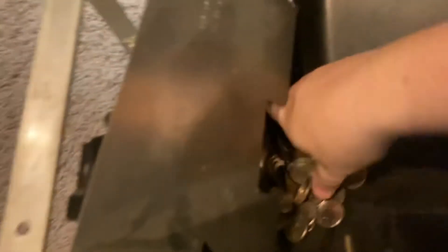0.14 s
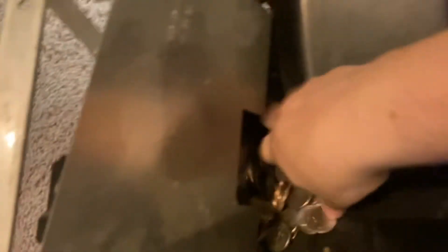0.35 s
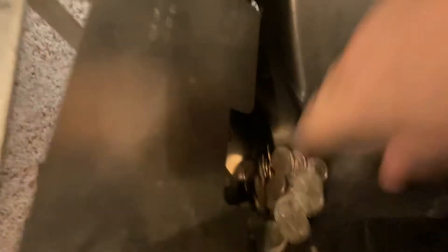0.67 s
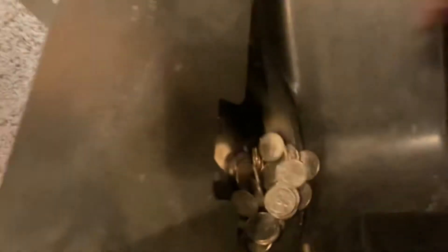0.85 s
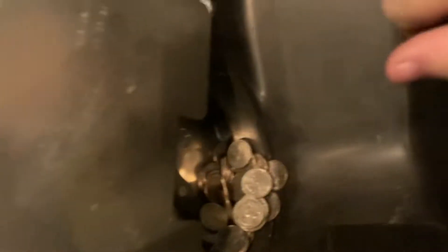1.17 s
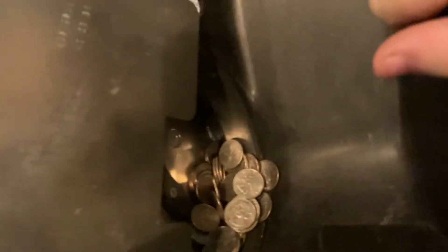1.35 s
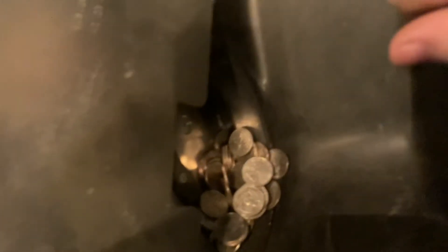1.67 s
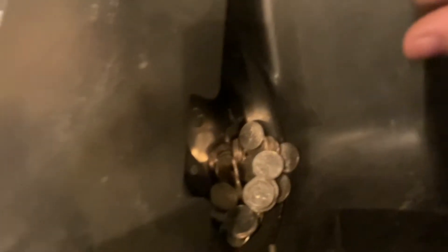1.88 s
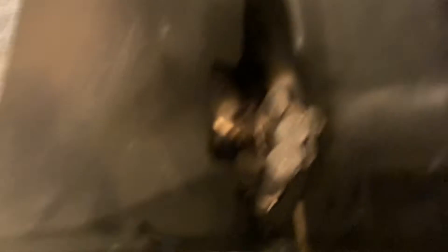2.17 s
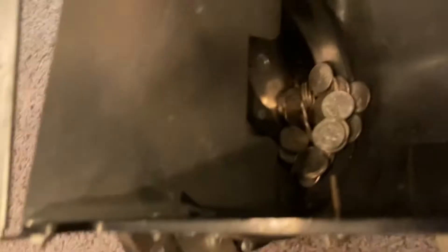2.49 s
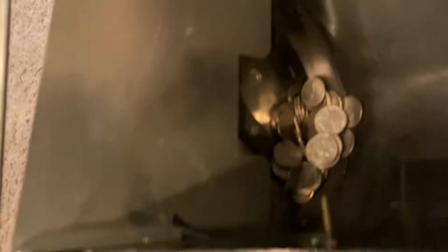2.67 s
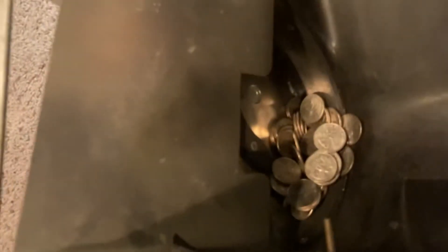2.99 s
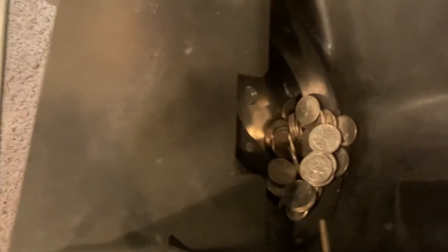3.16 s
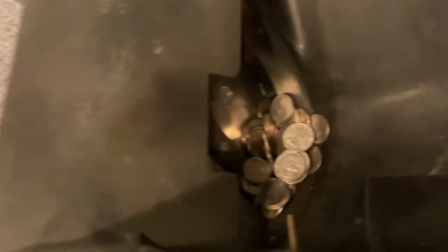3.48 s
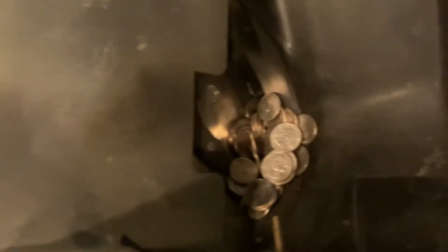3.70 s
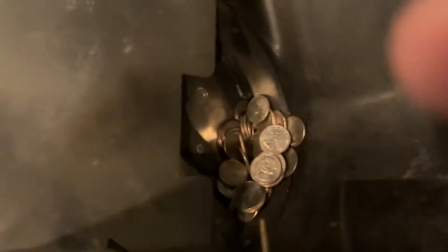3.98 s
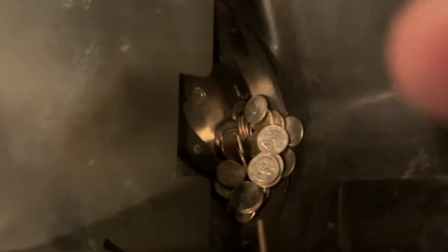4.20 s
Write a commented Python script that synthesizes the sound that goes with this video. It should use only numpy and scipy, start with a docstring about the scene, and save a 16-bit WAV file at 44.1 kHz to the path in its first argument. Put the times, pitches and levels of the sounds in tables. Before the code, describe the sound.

Close inside a hollow sheet-metal bucket, a hand stirs loose coins. From 0 to about 0.2 s there are light, crisp clinks and small scrapes. At roughly 0.22 s the hand shoves the heap: a dense, loud burst of bright coin clatter, with very high short rings, midrange wall ringing and low dull booms from the bottom, strongest from 0.25 to 0.55 s. It thins into scattered weaker ticks until 0.72 s. At about 0.75 s the hand lifts with a muffled thud and a last coin clinks, leaving a brief metallic ring. Soft airy brushing of the arm fades between 0.8 and 1.5 s. Throughout, a fan gives a low, gently wavering hum with soft airflow in a dry carpeted room, plus slight hiss. A barely audible tick comes near 2.9 s, a clearer tick with a quick dull double thud at 3.24 s, and a faint tick at 3.42 s. Then only the fan remains.

```python
"""Coins stirred in a metal bucket

Close to a phone, a hand stirs a heap of coins on a sheet-metal bucket's bottom, lifts off and drops a last coin.
Each contact sums a noisy click, short coin modes and ringing of wall and bottom; pushes make the bottom boom.
A fan hums throughout in the carpeted room: wavering harmonics over filtered noise. The arm brushes past as
shaped noise, and faint grip ticks and a double thud follow."""
import sys
import numpy as np
from scipy import signal
from scipy.fft import rfft, irfft, next_fast_len
from scipy.io import wavfile
from scipy.ndimage import uniform_filter1d

SR = 44100
rng = np.random.default_rng(int(sys.argv[2]) if len(sys.argv) > 2 else 0)


def generate_wav(signal):
    """Clip the signal to [-1, 1] and save it as 16-bit WAV at the path in sys.argv[1]."""
    frames = np.transpose(np.atleast_2d(signal))
    scaled = np.clip(frames, -1, 1) * 32767
    pcm = np.round(scaled).astype(np.int16)
    wavfile.write(sys.argv[1], SR, pcm)


N = 191394

# The fan's hum. Each row: multiple of the shaft rate, mean level in dB.
FAN_HARMONICS = [(1, -51.5), (3, -52.5), (4, -58), (5, -61), (6, -64.5)]
# The fan's low rumble. Each row: frequency in Hz, density in dB per Hz.
FAN_RUMBLE = [(25, -100), (35, -90.5), (45, -86.5), (75, -69.5), (135, -72.5), (170, -66), (200, -70.5),
              (235, -67.5), (280, -72.5), (315, -81.5), (400, -77), (470, -90), (900, -120)]
# The fan's airflow before its flutter. Each row: frequency in Hz, density in dB per Hz.
FAN_AIRFLOW = [(300, -87.5), (600, -89), (780, -84), (1300, -90.5), (1650, -91.5), (2200, -93),
               (2500, -96.5), (3100, -98), (3600, -102), (4700, -101.5), (6500, -116), (9000, -135)]
# Hiss of the microphones. Each row: frequency in Hz, density in dB per Hz.
MIC_HISS = [(4000, -120), (7000, -116), (8400, -112), (10500, -117), (12500, -118), (15500, -126)]
# Colour of the room's tail. Each row: frequency in Hz, relative level in dB.
ROOM_COLOUR = [(2000, 8), (6000, 1), (11000, -7.5), (15000, -10)]
# Likeness of left and right for the fan. Each row: frequency in Hz, coherence from 0 to 1.
ROOM_COHERENCE = [(60, 0.93), (300, 0.99), (500, 0.93), (1000, 0.5), (4500, 0.13)]
# Likeness of left and right for close sounds and hiss. Each row: frequency in Hz, coherence from 0 to 1.
NEAR_COHERENCE = [(300, 0.29), (550, 0.94), (1000, 0.62), (2000, 0.26), (4500, .15), (6000, 0.29),
                  (7500, 0.98), (9000, 1), (14000, 0.56), (15300, 0.65)]
# Left minus right for the bucket. Each row: frequency in Hz, difference in dB.
BUCKET_BALANCE = [(200, -1.5), (600, 3), (1800, 3.5), (4000, 1), (7000, -2)]
# Echoes between the bucket's walls. Each row: delay in seconds, level in dB.
WALL_ECHOES = [(.0034, -16.5)]
# Ticks of the grip. Each row: start in seconds, level in dB.
GRIP_TICKS = [(2.8911, -33), (3.2380, -18), (3.421, -30.5)]
# Spectrum of a grip tick. Each row: frequency in Hz, relative density in dB.
TICK_SPECTRUM = [(1000, -19), (3000, 5.5), (4000, 11), (6000, 5), (8000, 13), (12000, 10), (16000, -1)]
# Dull handling thuds. Each row: start in seconds, level in dB, low pitch in Hz, high pitch in Hz.
HANDLING_THUDS = [(3.2392, -16.5, 563, 970), (3.2564, -18.5, 562, 1367)]
# Spectrum of a handling thud's crack. Each row: frequency in Hz, relative density in dB.
THUD_SPECTRUM = [(120, -12), (200, -1), (350, 0), (520, 11.5), (720, 10), (900, -4), (1400, -7),
                 (3000, -11), (4500, -14), (8000, -21)]
# Faint ring of a handling thud. Each row: frequency in Hz, relative level in dB, t60 in seconds.
THUD_RING = [(403, -6, 0.44), (533, 6, 0.38), (590, 2, .1), (989, -1, 0.21), (1360, -16, .28),
             (1750, -4, .4)]
# The arm brushes past as it draws back. Each row: centre in seconds, half length in seconds (to 1/e),
# mean level in dB before flutter and swell, brightness in dB per octave.
ARM_BRUSHES = [(0.874, .14, -54.5, -3.5), (1.11, .07, -60, -0.5), (1.248, .25, -69.5, -2)]
# Spectrum of the brushing before its tilt. Each row: frequency in Hz, relative density in dB.
RUB_SPECTRUM = [(1500, -10.5), (3800, 12.5), (4800, -3.5), (5800, 6), (8000, -8), (11500, 1), (16000, -24)]
# Spectrum of the bucket's bottom. Each row: frequency in Hz, relative density in dB.
BOTTOM_SPECTRUM = [(40, -49), (140, -22.5), (230, 0.5), (330, -0.5), (380, 7), (420, 2.5), (490, 4.5),
                   (600, 3.5), (700, -6.5), (850, -7.5), (1000, -7), (1500, -12), (5000, -45)]
# Booming of the loaded bottom. Each row: frequency in Hz, relative level in dB, t60 in seconds.
BOOM_RING = [(243, 1, .13), (290, -2.5, .12), (382, -0.5, 0.11), (473, 2.5, .2), (509, 3, .14),
             (607, 1.5, .12)]
# The hand shoves the heap at the bottom. Each row: start in seconds, level in dB, favoured pitch in Hz.
HEAP_SHOVES = [(.221, -12, 243), (.252, -2.5, 607), (.264, 2, 509), (.272, -2, 243), (.303, -2, 290),
               (.331, -4, 290), (.386, -8.5, 382), (.398, -4, 607), (.423, -.5, 473), (.462, -6.5, 382),
               (.492, -4.5, 509)]
# Ringing of the bucket's wall. Each row: frequency in Hz, relative level in dB, undamped t60 in seconds.
WALL_RING = [(981, 1.5, .16), (1220, -3.5, 0.17), (1310, 5, 0.163), (1460, -2, .16), (1615, 2.5, 0.36),
             (1677, 4.5, 0.25), (1814, 3, 0.91), (1970, 3.5, .15), (2013, 1.5, 0.18), (2028, 5, 0.3),
             (2331, -5, .5), (2430, -1.5, 0.18), (2630, 5, 0.17), (2900, 1, 0.16), (3260, 3, .14),
             (3360, 2, 0.11), (3770, 0, .15), (4217, 1.5, .12), (5685, -4, .12)]
# Spectrum of the bucket's wall, uneven from spot to spot. Each row: frequency in Hz, relative density in dB.
WALL_SPECTRUM = [(200, -24), (850, -5.5), (1100, -4), (1300, 2.5), (1550, -2.5), (1800, 5), (2100, 2),
                 (2400, -1), (3200, 1.5), (4500, -4), (8000, -13.5)]
# Lowest bending modes of the coins. Each row: frequency in Hz, relative level in dB.
COIN_RING = [(14700, -4.5), (14985, -6.5), (15128, -2), (15198, -1), (15329, 1), (15478, -3.5), (15564, 4)]
# Spectrum of a coin's click, uneven from spot to spot. Each row: frequency in Hz, relative density in dB.
CLICK_SPECTRUM = [(300, -44), (2000, -13.5), (3500, -0.5), (5200, -.5), (6500, 2.5), (8000, 2.5),
                  (9500, 9.5), (11000, 7), (13000, 3.5), (16000, -9.5)]
# Sweeps of the hand through the heap; contacts before time zero are left out.
# Each row: start in seconds, end in seconds, effort in dB, settling afterwards in dB per second.
HAND_SWEEPS = [(-.04, 0.082, -38.5, 901), (0.048, 0.103, -41, 898), (0.139, 0.155, -35, 1798),
               (0.221, 0.425, -18.5, 298.5), (0.451, 0.51, -21, 112.5)]
# Coins that strike hard. Each row: start in seconds, relative level in dB, knock on the wall relative to the
# click in dB, extra ring of the coin in dB, change per bounce in dB, pitch of the wall in Hz,
# low pitch of the coins in Hz, high pitch of the coins in Hz.
HARD_STRIKES = [(.002, -9, -0.5, -5, -2.5, 1220, 5470, 10700),
                (.011, -10.5, -0.5, 0.5, -2.5, 1320, 8100, 11500),
                (.0243, -10, -19, -2, -7, 3108, 5940, 10680),
                (.056, -16, -0.5, 1.5, -4.5, 3310, 5990, 11060),
                (.083, -14.5, 4.5, -3.5, 1.5, 2210, 5950, 11980),
                (.0907, 0.5, -1, 0, -4.5, 2178, 6000, 10640), (.112, -20.5, 7, -2.5, 0, 1970, 3540, 10050),
                (.122, -24.5, 11, -0.5, -5.5, 1882, 3520, 10000),
                (.1353, -19.5, 14, -0.5, -4, 1460, 3630, 11870), (.154, -7, -5, 3, -3, 2334, 3800, 9995),
                (.164, -19, 9.5, 0, -8.5, 3053, 3780, 9820), (.216, -1, -2.5, -7.5, -12, 1200, 3630, 12750),
                (.228, -6, 4.5, -5.5, -6, 1272, 6240, 12760),
                (.2363, -1.5, -1.5, -6, -1, 2070, 6170, 10380),
                (.2511, 15.5, -4, 1.5, -2.5, 2049, 3770, 12320),
                (.2619, 14.5, -1.5, 4.5, -2, 3203, 7750, 10030), (.27, 9, -1.5, 3, 2.5, 1398, 7700, 10030),
                (.277, 11, -18, 1.5, -3.5, 1900, 8000, 10720),
                (.3025, 6.5, -7.5, -1, 1.5, 2707, 8190, 9830),
                (.3345, 10, -6.5, -5.5, -3.5, 2540, 7700, 12170), (.347, 9, -7, 0, 1.5, 1865, 7900, 10330),
                (.353, 13.5, -2, 0.5, -5, 2140, 8000, 10470),
                (.376, 7.5, -2.5, -2.5, -6.5, 2992, 8140, 10280),
                (.385, 7.5, -3.5, 3, -0.5, 2942, 6910, 10550), (.391, 12.5, -10, -1, 0, 2070, 6850, 10530),
                (.398, 11, 2.5, -1.5, -2.5, 2007, 6660, 10140), (.4222, 2, 12, 2, -6, 2040, 4080, 10680),
                (.428, 1, 4.5, 1, -7, 2680, 4150, 9960), (.449, -2.5, -3.5, 0.5, -6, 1420, 5610, 11480),
                (0.4594, 11, -1.5, 2.5, -2.5, 2940, 4980, 11910), (.4848, 7, -5, 1, -4, 3460, 7670, 10470),
                (0.4911, 11, -5, -1, -4.5, 3293, 5030, 10450), (.4976, 8.5, -3, -4, -1, 1690, 3930, 9940),
                (.507, 0.5, 0, 2, -3, 2384, 4030, 9780), (.5405, 9.5, -4, 2.5, 0, 2967, 7430, 10620),
                (.544, 1.5, -12, 6, 0, 2650, 7600, 10700), (.554, -1.5, 3, -0.5, 8.5, 2651, 7350, 10700),
                (.56, -5.5, -2.5, 5.5, -9.5, 2640, 7790, 9970), (.602, -3.5, 5, 4, -5, 2200, 4400, 10200),
                (.638, -4, -16, 0, 0, 2400, 7760, 10050), (.649, -6, -12, 0, -7, 1920, 8100, 9810),
                (.66, -8, -9, -4, -3.5, 1920, 7840, 9800), (.681, -8.5, -9, -11, -2, 1830, 7800, 10000),
                (.7173, -9, -7.5, -5, 0, 1640, 8070, 11040), (.7505, 2.5, -5, -1, -3.5, 1690, 8300, 9760),
                (.757, -3, -1.5, -3, -6, 1220, 7640, 11130)]

TIME = np.arange(N) / SR
RING_TIME = TIME[:SR // 2]
FAN_HZ, FAN_LAG_S = 57.48, .00041  # shaft rate; delay of the right channel
# spread of coin pitches and of the wall's modes in the shifting heap, as a share of the frequency
COIN_SPREAD, WALL_SPREAD = 0.0024, 0.0025
# a sweep starts softly and reaches its full effort after this time
DIG_S, DIG_DB = 0.0408, -13
# the fingers open: coins ring more freely and the weight comes off the bottom
RELEASE_AT_S, RELEASE_S = 0.29, 0.0897
FREED_RING_DB, UNLOADED_BOTTOM_DB = 9.5, -4.5
BODY_GROWTH = 0.76  # dB gained by bottom, and by the wall in sweeps, per dB of click
LIFT_S, LIFT_DB = .744, -4  # the hand lifts off the bottom
PORT_LAG_S, PORT_MATCH_HZ = .000222, 6850  # treble lag between the ports, and where it sets in
TOP_HZ = 15750


def undb(db):
    """Decibels to gain."""
    return 10 ** (np.asarray(db) / 20)


def unit(x):
    """Scale to a mean energy of one per channel."""
    return x / np.sqrt(np.sum(x ** 2, axis=-1).mean())


def along(points, size):
    """Read (Hz, value) points at the bins of a transform of this size."""
    hz, value = np.transpose(points)
    bins = np.arange(size // 2 + 1) * SR / size
    return np.interp(np.log(bins + 1), np.log(hz), value)


def colour(x, spectrum):
    """Minimum-phase, so causal, filter with the given (Hz, dB) spectrum."""
    size = 2 * next_fast_len(x.shape[-1])
    # folding the cepstrum onto positive time gives the minimum phase
    cepstrum = irfft(np.log(undb(along(spectrum, size))))
    cepstrum[1:size // 2] *= 2
    cepstrum[size // 2 + 1:] = 0
    response = np.exp(rfft(cepstrum))
    return irfft(rfft(x, size) * response)[..., :x.shape[-1]]


def pair(two, likeness):
    """Mix two unrelated signals into left and right with the given coherence."""
    size = 2 * next_fast_len(two.shape[-1])
    c = np.clip(along(likeness, size), 0, 1)
    mid, side = rfft(two, size) * np.sqrt([(1 + c) / 2, (1 - c) / 2])
    return irfft(np.array([mid + side, mid - side]))[:, :two.shape[-1]]


def noise(spectrum):
    """Two unrelated noises with the given dB per Hz."""
    return colour(rng.standard_normal((2, N)), spectrum) * np.sqrt(SR / 2)


def wander(rate):
    """Slow random drift with a spread near one, through `rate` random points per second."""
    return np.interp(TIME * rate, np.arange(200), rng.standard_normal(200))


def decay(t60):
    """Exponential decay by 60 dB in t60 seconds."""
    return undb(-60 * RING_TIME / t60)


def decaying_noise(t60):
    """Two unrelated noises that die away, with an energy of one."""
    return unit(rng.standard_normal((2, len(RING_TIME))) * decay(t60))


def note(hz, t60):
    """One decaying resonance with an energy of one."""
    return unit(np.sin(2 * np.pi * hz * RING_TIME) * decay(t60))


def burst(spectrum, t60, tail_db, tail_t60):
    """Countless close modes, as noise: a fast decay and a longer tail."""
    fast = decaying_noise(t60)
    slow = decaying_noise(tail_t60)
    return unit(pair(colour(fast + undb(tail_db) * slow, spectrum), NEAR_COHERENCE))


def ring(modes):
    """Decaying sines, randomly weighted as by where the blow lands."""
    waves = []
    for hz, db, t60 in modes:
        sine = np.sin(2 * np.pi * hz * RING_TIME)
        waves.append(undb(db) * sine * decay(t60) / np.sqrt(t60))
    weights = rng.standard_normal((2, len(modes)))
    return unit(pair(weights @ np.array(waves), NEAR_COHERENCE))


def detuned(modes, spread):
    """The same modes, each pulled a little sharp or flat."""
    return [(hz * (1 + spread * rng.standard_normal()), db, t60) for hz, db, t60 in modes]


def uneven(spectrum, ripple_db, count=70):
    """Each spot favours some resonances and misses others."""
    hz, db = np.transpose(spectrum)
    grid = np.geomspace(hz[0], hz[-1], count)
    smooth = np.interp(np.log(grid), np.log(hz), db)
    return np.column_stack([grid, smooth + ripple_db * rng.standard_normal(count)])


def blows(times, sizes):
    """A train of impulses."""
    return np.bincount(np.clip(times * SR, 0, N - 1).astype(int), sizes, N)


def sound(force, response):
    """A force train played through a response of one or two channels."""
    active = force[None, :np.flatnonzero(force)[-1] + 1]
    out = signal.fftconvolve(active, response, axes=1)[:, :N]
    return np.pad(out, ((0, 0), (0, N - out.shape[1])))


def single_blow(s, level_db, response):
    """One blow at s seconds."""
    return sound(blows(np.array([s]), undb([level_db])), response)


def hiss():
    """Steady noise of the microphones."""
    return pair(noise(MIC_HISS), NEAR_COHERENCE)


def fan(waver_db=1.5, drift_rad=0.61, flutter_db=1.5):
    """A fan off to the left: wavering shaft harmonics over rumble and fluttering airflow."""
    hum = 0
    for order, db in FAN_HARMONICS:
        level = undb(db + waver_db * wander(3.3)) * np.sqrt(2)
        drift = drift_rad * np.sqrt(order) * wander(3.114)
        hum = hum + level * np.sin(2 * np.pi * order * FAN_HZ * TIME + drift)
    air = noise(FAN_AIRFLOW) * undb(flutter_db * wander(7.6))
    left, right = hum + pair(noise(FAN_RUMBLE) + air, ROOM_COHERENCE)
    return np.array([left, np.roll(right, int(FAN_LAG_S * SR))])


def room(x, wet_db=-23, t60=.6):
    """The carpeted room adds a faint, dull tail."""
    tail = colour(decaying_noise(t60), ROOM_COLOUR)
    return x + undb(wet_db) * signal.fftconvolve(x, tail, axes=1)[:, :N]


def walls(x):
    """The bucket's walls return the sound within a few milliseconds, which makes it hollow."""
    out = x
    for s, db in WALL_ECHOES:
        delayed = np.pad(x, ((0, 0), (int(abs(s) * SR), 0)))[:, :N]
        out = out + undb(db) * delayed
    return out


def handling(modes_db=-7, crack_db=-2.0, crack_t60=0.03, tail_db=-5, tail_t60=.3,
             low_db=-4.0, high_db=-11, note_t60=0.036):
    """Faint ticks of the grip and a double thud whose two contacts punch at different pitches."""
    s, tick_db = np.transpose(GRIP_TICKS)
    out = sound(blows(s, undb(tick_db)), burst(TICK_SPECTRUM, t60=.016, tail_db=-12, tail_t60=.3))
    body = unit(sum(undb(db) * note(hz, t60) for hz, db, t60 in THUD_RING))
    for s, level_db, low_hz, high_hz in HANDLING_THUDS:
        crack = burst(THUD_SPECTRUM, crack_t60, tail_db, tail_t60)
        punch = undb(low_db) * note(low_hz, note_t60) + undb(high_db) * note(high_hz, note_t60)
        thud = undb(modes_db) * body + undb(crack_db) * crack + punch
        out = out + single_blow(s, level_db, thud)
    return out


def rustle(flutter_db=2):
    """Skin and sleeve brush softly as the arm leaves the bucket; each brush swells and fades unevenly."""
    out = 0
    for s, half, level_db, tilt in ARM_BRUSHES:
        tilted = [(hz, db + tilt * np.log2(hz / RUB_SPECTRUM[0][0])) for hz, db in RUB_SPECTRUM]
        rub = unit(pair(noise(tilted), NEAR_COHERENCE)) * np.sqrt(N)  # mean level of 0 dB
        swell = np.exp(-((TIME - s) / half) ** 2)
        out = out + rub * undb(level_db + flutter_db * wander(22)) * swell
    return out


def lift_off(boom_db=-6):
    """Freed of the hand's weight, the bottom flexes back with a dull thud."""
    thud = burst(BOTTOM_SPECTRUM, t60=0.17, tail_db=-12, tail_t60=0.35)
    return single_blow(LIFT_S, LIFT_DB, thud + undb(boom_db) * ring(BOOM_RING))


def shoves(focus_db_per_octave=24):
    """The weight of the hand makes the bottom boom, most of all near the mode under the push."""
    out = 0
    for s, level_db, favoured_hz in HEAP_SHOVES:
        boom = 0
        for hz, db, t60 in BOOM_RING:
            octaves_off = abs(np.log2(hz / favoured_hz))
            boom = boom + undb(db - focus_db_per_octave * octaves_off) * note(hz, t60)
        out = out + single_blow(s, level_db, unit(boom[None]))
    return out


def after_ring(level_db=-15):
    """With the hand gone, the last coin leaves the wall ringing freely."""
    wall = unit(sum(undb(db) * note(hz, t60) for hz, db, t60 in WALL_RING))
    return single_blow(HARD_STRIKES[-1][0], level_db, wall[None])


def strike_notes(wall_db=-12, low_db=-17, high_db=-9, wall_t60=0.06, coin_t60=0.047):
    """Each hard strike singles out one pitch of the wall and two of the wedged coins."""
    out = np.zeros(N)
    for s, click, knock, _, _, wall_hz, low_hz, high_hz in HARD_STRIKES:
        start = int(s * SR)
        coin = undb(low_db) * note(low_hz, coin_t60) + undb(high_db) * note(high_hz, coin_t60)
        wall = undb(knock + wall_db) * note(wall_hz, wall_t60)
        out[start:start + len(RING_TIME)] += undb(click) * (wall + coin)
    return out


def answer_db(s, click, knock, coin_db, bottom_db):
    """Levels of click, wall, ring and bottom; open fingers free the ring and unload the bottom."""
    released = np.clip((s - RELEASE_AT_S) / RELEASE_S, 0, 1)
    ring_db = click + coin_db + FREED_RING_DB * released
    thump_db = BODY_GROWTH * click + bottom_db + UNLOADED_BOTTOM_DB * released
    return np.array([click, knock, ring_db, thump_db])


def sliding(rate=450, scatter_db=3.5, wall_db=-11, coin_db=-5, bottom_db=-17, thinning_s=.06, count=200):
    """Coins tumble until the hand lifts off: rows (s, size of click, wall, ring, bottom) of small contacts."""
    rows = []
    for start, end, effort_db, settling in HAND_SWEEPS:
        chance = rng.standard_normal((count, 2))
        s = start + (np.arange(count) + chance[:, 0] / 2) / rate
        size = undb(scatter_db * np.clip(chance[:, 1], -2, 2))
        # neighbouring contacts share the energy that the hand puts in
        size *= np.sqrt(SR / rate / uniform_filter1d(size ** 2, size=10))
        # as the heap settles, the contacts thin out into separate ticks
        late = np.maximum(s - end, 0)
        s = s + late ** 2 / thinning_s
        size = size * np.sqrt(1 + 2 * late / thinning_s)
        # the hand digs in, pushes steadily, then the heap settles
        dig = DIG_DB * np.clip(1 - (s - start) / DIG_S, 0, 1)
        click = effort_db + dig - settling * np.maximum(s - end, 0)
        levels = answer_db(s, click, BODY_GROWTH * click + wall_db, coin_db, bottom_db)
        stirring = (s > 0) & (s < LIFT_S)
        rows.append(np.column_stack([s, *(stirring * size * undb(levels))]))
    return np.vstack(rows)


def striking(bounce_s=.0012, strike_db=-1.0, coin_db=-7, bottom_db=-12, count=5):
    """Hard strikes, each a quick chatter of mostly weakening bounces sharing its energy; rows as in sliding."""
    rows = []
    for s, click, knock, chime, bounce_db, *_ in HARD_STRIKES:
        levels = answer_db(s, click, click + knock, coin_db + chime, bottom_db)
        sizes = undb(levels + strike_db)
        for share in unit(undb(bounce_db * np.arange(count))):
            rows.append([s, *(share * sizes)])
            s += bounce_s * rng.uniform(.5, 1.5)
    return np.array(rows)


def clink(low_hz=7400, high_hz=12800, t60=0.041, count=4):
    """Wedged in the heap, each coin rings briefly at a few pitches of its own."""
    return ring([(hz, 0, t60) for hz in rng.uniform(low_hz, high_hz, count)])


def coins(coin_t60=0.052, modes_db=-6.5, clink_db=-5, held_t60=0.38, count=24):
    """Contacts fall on several spots; at each the coin and the bucket answer a little differently."""
    contacts = np.vstack([striking(), sliding()])
    # a few contacts in a row stay on the same spot
    spots = np.arange(len(contacts)) // 5 % count
    # the hand damps the wall's longest modes
    held = [(hz, db, min(t60, held_t60)) for hz, db, t60 in WALL_RING]
    bending = [(hz, db, coin_t60) for hz, db in COIN_RING]
    clicks = rings = bucket = 0
    for spot in range(count):
        s, click, knock, chime, thump = contacts[spots == spot].T
        edge, sheet = uneven(CLICK_SPECTRUM, 2.5), uneven(WALL_SPECTRUM, 2)
        rim = burst(edge, t60=.005, tail_db=2.5, tail_t60=0.096) + undb(clink_db) * clink()
        clicks = clicks + sound(blows(s, click), unit(rim))
        rings = rings + sound(blows(s, chime), ring(detuned(bending, COIN_SPREAD)))
        wall = burst(sheet, t60=0.019, tail_db=-3.0, tail_t60=0.062)
        wall = wall + undb(modes_db) * ring(detuned(held, WALL_SPREAD))
        bucket = bucket + sound(blows(s, knock), unit(wall))
        bottom = burst(BOTTOM_SPECTRUM, t60=0.045, tail_db=-1.5, tail_t60=0.97)
        bucket = bucket + sound(blows(s, thump), bottom)
    # the bucket's midrange is louder on the left
    balance = undb(np.outer([.5, -.5], along(BUCKET_BALANCE, N)))
    return clicks + rings + irfft(rfft(bucket) * balance, N)


def scene():
    """Coins and fan heard from the mouth of the bucket, with boom, handling noises and hiss."""
    stirred = room(coins() + strike_notes() + after_ring())
    hollow = walls(stirred + fan())
    return hollow + shoves() + lift_off() + rustle() + handling() + hiss()


def gain_control(x, threshold_db=-13, share=0.36, recovery_db_per_s=16):
    """Loud peaks turn the gain down by a share of their excess; it creeps back afterwards."""
    over = 20 * np.log10(np.abs(x).max(axis=0) + 1e-9) - threshold_db
    # hold each peak while it falls at the recovery rate
    held = np.maximum.accumulate(over + recovery_db_per_s * TIME) - recovery_db_per_s * TIME
    return x * undb(-share * uniform_filter1d(np.maximum(held, 0), size=200))


def record(dry):
    """The phone rides its gain, its two ports set a small treble lag left to right, and the top is cut."""
    bins = np.arange(N // 2 + 1) * SR / N
    phase = 2 * np.pi * PORT_LAG_S * np.maximum(bins - PORT_MATCH_HZ, 0)
    turn = np.exp(1j * np.outer([.5, -.5], phase))
    ports = irfft(rfft(gain_control(dry)) * turn, N)
    return signal.sosfilt(signal.ellip(10, .2, 70, TOP_HZ, fs=SR, output="sos"), ports)


dry = scene()
out = record(dry)
generate_wav(out)
```